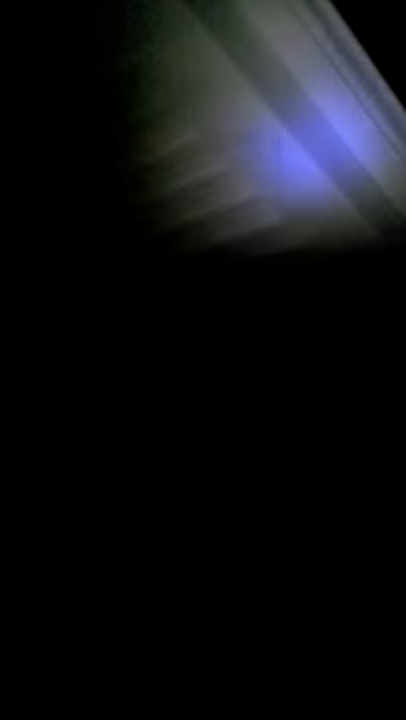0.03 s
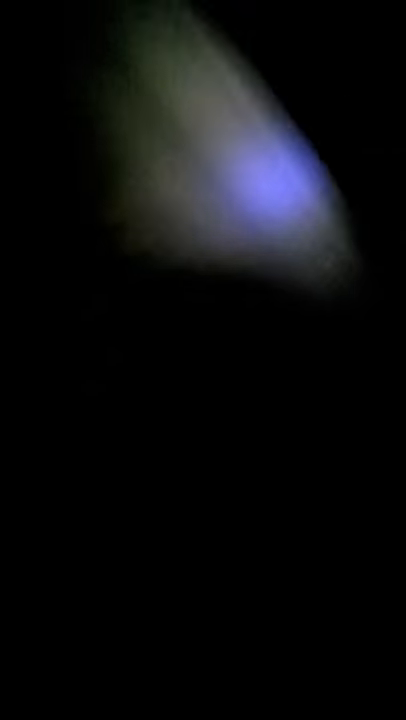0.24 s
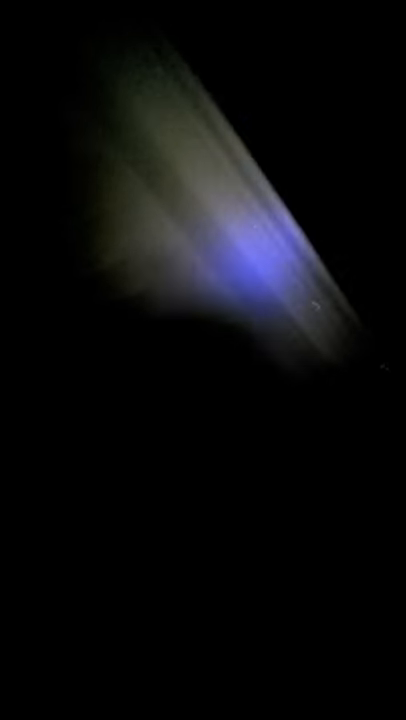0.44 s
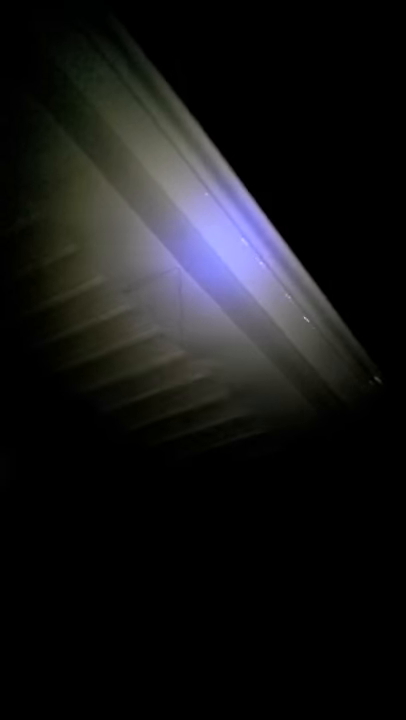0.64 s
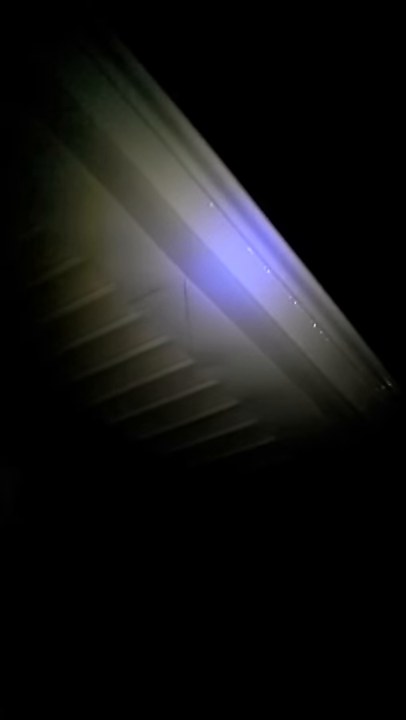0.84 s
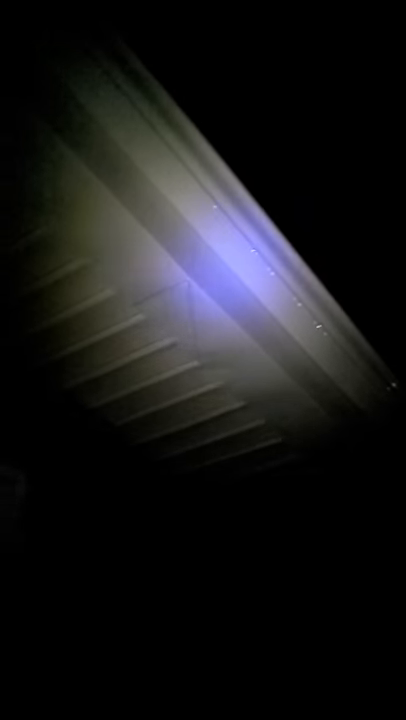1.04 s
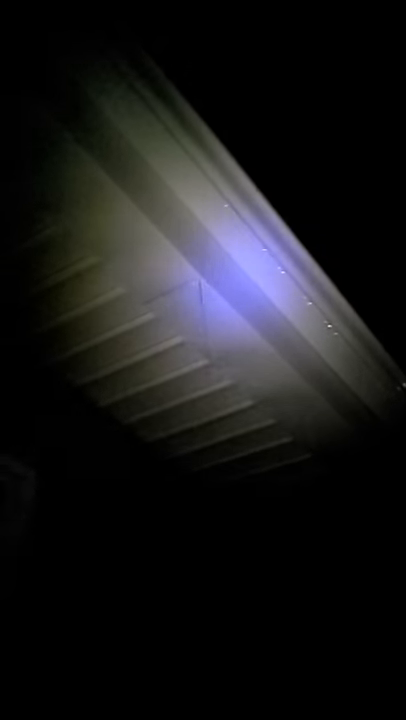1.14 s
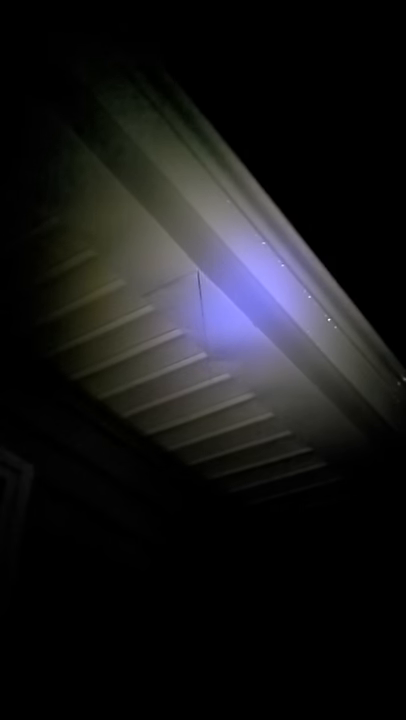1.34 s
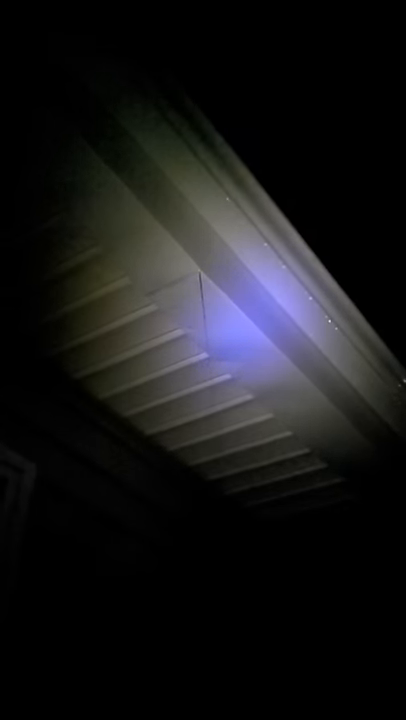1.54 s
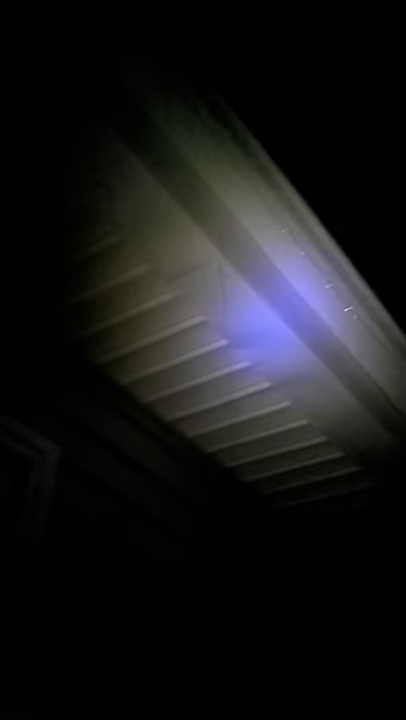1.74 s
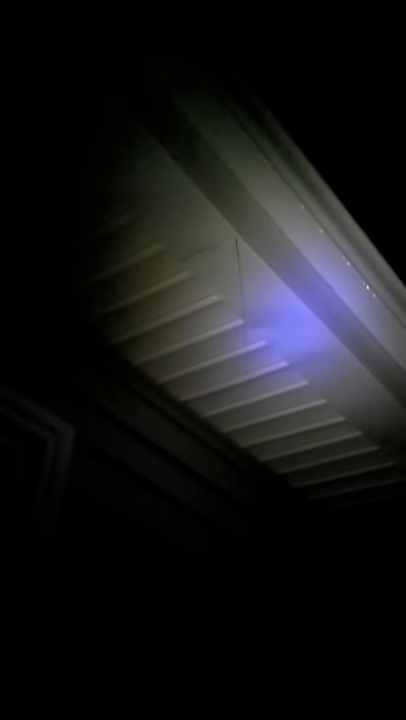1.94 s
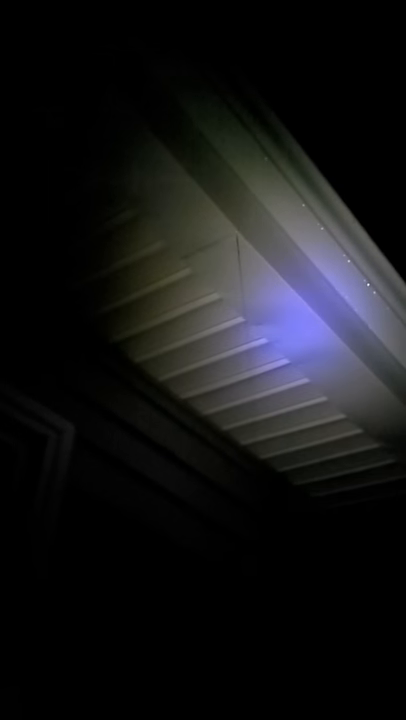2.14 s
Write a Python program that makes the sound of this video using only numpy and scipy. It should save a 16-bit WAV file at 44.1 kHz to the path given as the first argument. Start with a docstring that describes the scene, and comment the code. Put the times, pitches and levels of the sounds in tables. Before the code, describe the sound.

Light ticking drips off a roof edge over faint rain, with brief microphone bumps.

```python
"""Night: a soft low rumble and a thin wash of distant rain fade in, and water drips from a house eave.
Each impact excites a brief bright tick, mostly in the left microphone. From 0.1 s a camera shifts in
the hand: friction makes its case rustle, knocks and a thump excite its damped modes, and a fingertip
scuffs it once. After the first second the dripping goes on, with two duller splats on wet ground."""
import sys
import numpy as np
from scipy import signal
from scipy.io import wavfile
from scipy.ndimage import uniform_filter1d

SR = 44100
rng = np.random.default_rng(int(sys.argv[2]) if len(sys.argv) > 2 else 0)


def transcribe(signal):
    """Save signal, clipped to [-1, 1], as a 16-bit WAV file at the path in sys.argv[1]."""
    frames = np.atleast_2d(signal).T
    limited = np.clip(frames, -1, 1)
    pcm = np.round(limited * 32767).astype(np.int16)
    wavfile.write(sys.argv[1], SR, pcm)


N = 97020
BAND_LIMIT_HZ = 14700


def amp(db):
    """Amplitude ratio of a level in decibels."""
    return 10 ** (np.asarray(db) / 20)


def unit(x):
    """Normalisation to rms 1."""
    return x / np.sqrt(np.mean(x ** 2) + 1e-20)


def add(mix, start, sound):
    """Superposition: a sound joins the mix at start/s."""
    part = mix[max(round(start * SR), 0):][:len(sound)]
    part += sound[:len(part)]


def colour(x, spectrum, size=4096):
    """Minimum-phase filtering by a spectral envelope (f/Hz, level/dB)."""
    hz, db = np.transpose(spectrum)
    bin_hz = abs(np.fft.fftfreq(size, 1 / SR)) + 1
    log_gain = np.log(amp(np.interp(np.log(bin_hz), np.log(hz), db)))
    response = np.exp(np.conj(signal.hilbert(log_gain)))
    taps = np.fft.ifft(response).real[:size // 2]
    return signal.fftconvolve(x, taps)[:len(x)]


def noise(spectrum, modulation=1):
    """Source and filter: white noise, modulated, coloured and brought to rms 1."""
    return unit(colour(modulation * rng.standard_normal(N), spectrum))


def background():
    """Stationary noise: outdoor rumble is coherent at the two microphones, distant rain incoherent."""
    # spectral envelopes (f/Hz, relative level/dB)
    rumble_spectrum = [(36, -26), (68, -1.5), (125, 1.5), (240, -7), (320, -4.5), (430, -12.5),
                       (800, -13.5), (1500, -32), (5000, -49)]
    rain_left = [(100, -6.5), (1600, 3.5), (2800, -1), (4700, -6), (6500, 2), (8200, -7.5), (15000, -10)]
    rain_right = [(100, 4), (800, 0), (1500, -7.5), (3000, -7.5), (6800, -12), (9300, -6.5), (15000, -14.5)]
    rumble = np.outer(amp([-53, -54.5]), noise(rumble_spectrum))
    return rumble + [amp(-56.5) * noise(rain_left), amp(-57) * noise(rain_right)]


def drop(band, spectrum, size=4096):
    """Impact response: an impulse and exponentially decaying noise, filtered at a slightly random pitch."""
    t = np.arange(size) / SR
    # band 0: bright ring, 1: lower ring, 2: spray
    splash = amp([-17, -19.5, -2.5][band]) * np.exp(-t / 0.0007)
    fallback = amp([-27, -30, -3.5][band]) * np.exp(-t / 0.0092)  # droplets and near echoes
    wall_echo = amp(-34.5) * np.exp(-t / 0.014)
    detuned = np.array(spectrum) * [1 + 0.04 * rng.uniform(-0.96, 1), 1]
    excitation = (t == 0) + (splash + fallback + wall_echo) * rng.standard_normal(size)
    tick = colour(excitation, detuned, size=1024)
    power = uniform_filter1d(tick ** 2, size=88, mode="constant")
    return tick / np.sqrt(2 * power.max())  # the envelope peaks at 1


def drips(fine_per_s=170, spread_db=2.5, variants=8):
    """Superposed impacts: large drops land one by one over the shot noise of fine ones."""
    # large drops (t/s, bright ring level/dB, lower ring level/dB, spray level/dB)
    landings = [(0.0825, -35.5, -37.5, -67), (0.1116, -29, -36, -50), (0.1945, -34, -46, -62),
                (0.2291, -27, -44, -52), (0.2355, -29, -32, -44), (0.2617, -32, -55, -52),
                (0.282, -34.5, -37, -39), (0.3237, -35, -57, -49), (0.3358, -31, -58, -45),
                (0.3519, -25.5, -38, -44), (0.3893, -29, -60, -43), (0.4414, -27.5, -49.5, -42),
                (0.447, -28.5, -32.5, -48.5), (0.4863, -28.5, -33, -47), (0.5642, -26, -46, -45),
                (0.573, -34.5, -35, -45), (0.655, -44, -58, -54), (0.7217, -34, -40.5, -58),
                (0.7487, -34, -37.5, -53), (0.7678, -22.5, -34.5, -47), (0.8197, -36.5, -35, -64),
                (0.9142, -35, -39.5, -47), (0.9345, -36, -37.5, -43), (0.985, -36.5, -56, -40),
                (1.0111, -37, -55, -42.5), (1.1628, -30.5, -43, -45.5), (1.2174, -34, -41, -62),
                (1.2705, -34, -30.5, -63), (1.35, -36.5, -38.5, -52), (1.3629, -34, -36.5, -55),
                (1.4111, -35, -39, -60.5), (1.4686, -30.5, -55, -46), (1.4824, -41, -40.5, -51),
                (1.5027, -35, -39, -43), (1.5148, -31.5, -47, -49), (1.5324, -38, -49, -49),
                (1.5712, -29, -33, -50), (1.6257, -34.5, -52, -50), (1.652, -30.5, -37.5, -45.5),
                (1.6639, -44, -40, -50), (1.6805, -34, -39, -51), (1.7166, -34, -40, -50.5),
                (1.7316, -29, -48, -35.5), (1.757, -35, -35, -45), (1.841, -35, -38.5, -63),
                (1.8575, -27.5, -31.5, -67), (1.9239, -36.5, -36, -66), (1.9853, -35.5, -42, -51),
                (2.087, -36, -36.5, -68), (2.1047, -30.5, -35, -54), (2.1438, -30.5, -43.5, -48),
                (2.1916, -36.5, -41.5, -63)]
    # spectral envelopes of a drop's three bands (f/Hz, relative level/dB)
    bright_ring = [(3000, -34.5), (5200, -16), (6000, -4), (6550, 0), (7100, -7), (7900, -21.5),
                   (12000, -55)]
    lower_ring = [(1800, -22), (3200, -27), (4050, -10), (4650, 0), (5350, -3), (6500, -20), (12000, -42)]
    spray = [(2500, -20), (6000, 0.5), (8500, -1), (12000, -2.5), (15000, -10)]
    # muffled right microphone relative to the left (level/dB for each band)
    right_db = [-38, -45, -15]
    fine_db = [-51, -55.5, -63.5]
    out = np.zeros((2, N))
    arrivals = rng.random((variants, N)) < fine_per_s / variants / SR
    trains = arrivals * amp(spread_db * np.minimum(rng.exponential(1, (variants, N)), 3))
    for band, spectrum in enumerate([bright_ring, lower_ring, spray]):
        patter = sum(signal.oaconvolve(train, drop(band, spectrum))[:N] for train in trains)
        ticks = amp(fine_db[band]) * unit(patter)
        for start, *levels in landings:
            add(ticks, start, amp(levels[band]) * drop(band, spectrum))
        out += np.outer([1, amp(right_db[band])], ticks)
    return out


def stroke(start, attack, hold, release):
    """Trapezoidal envelope of one hand movement; times in seconds."""
    return np.interp(np.arange(N) / SR, start + np.cumsum([0, attack, hold, release]), [0, 1, 1, 0])


def friction(spectrum, grain_db=2):
    """Sliding friction: rapid random amplitude modulation makes noise grainy."""
    roughness = unit(uniform_filter1d(rng.standard_normal(N), size=60))
    return noise(spectrum, amp(grain_db * roughness))


def rubbing():
    """Friction noise of the hand on the case follows the pressure of each stroke."""
    # strokes (t/s, attack/s, hold/s, release/s, left level/dB, right level/dB)
    rubs = [(0.104, 0.051, 0.037, 0.027, -57, -46.5), (0.218, 0.0016, 0.018, 0.056, -39, -38.5),
            (0.303, 0.028, 0.071, 0.032, -51.5, -46.5), (0.437, 0.0041, 0.0081, 0.046, -49, -45.5)]
    # spectral envelope of the rustle (f/Hz, relative level/dB)
    spectrum = [(80, -4), (230, 14), (1200, 0.5), (6000, -1.5), (9500, -5.5), (14500, -31)]
    pressure = sum(np.outer(amp([left, right]), stroke(*timing)) for *timing, left, right in rubs)
    return pressure * [friction(spectrum), friction(spectrum)]


def knocks(size=2048):
    """Impulses excite damped modes of the case; a softer touch has a lower treble cutoff."""
    # modes (t/s, peak level/dB, f/Hz, bandwidth/Hz, bass cutoff/Hz, treble cutoff/Hz, 0 left or 1 right)
    modes = [ (0.1393, -33.5, 597, 110, 300, 925, 1), (0.2232, -4.5, 1360, 4940, 316, 6400, 0),
             (0.2231, -8, 626, 154, 256, 1270, 1), (.22381, -13.5, 1360, 467, 815, 2440, 1),
             (.2400, -21, 585, 130, 250, 1050, 1), (0.2945, -1.5, 82, 194, 104, 11700, 0),
             (0.3563, -7, 6200, 16000, 890, 13900, 0), (0.5782, -29, 510, 690, 100, 1800, 1),
             (0.9006, -7, 373, 660, 36, 1295, 1), (0.9113, -29.5, 520, 300, 100, 1310, 1),
             (0.9131, -26.5, 500, 400, 100, 1300, 1)]
    out = np.zeros((2, N))
    for start, db, hz, width_hz, bass_hz, treble_hz, side in modes:
        radius = np.exp(-np.pi * width_hz / SR)
        feedback = [1, -(1 + radius ** 2) * np.cos(2 * np.pi * hz / SR), radius ** 2]
        ring = signal.lfilter([1, -1], feedback, signal.unit_impulse(size))
        ring = signal.lfilter(*signal.butter(2, bass_hz, "high", fs=SR), ring)
        ring = signal.lfilter(*signal.butter(3, treble_hz, fs=SR), ring)
        add(out[int(side)], start, amp(db) * ring / abs(ring).max())
    return out


def scuff():
    """A fingertip slides over the right microphone: a short burst of bright friction noise."""
    # spectral envelope (f/Hz, relative level/dB)
    spectrum = [(1500, -12.5), (2500, -10), (3700, -12), (6000, -2), (8700, 0.5), (14500, -15.5)]
    pressure = stroke(start=0.536, attack=0.0025, hold=0.014, release=0.016)
    return np.outer([0, amp(-28.5)], pressure * friction(spectrum))


def splats():
    """Impacts on wet ground to the left sound duller: their energy lies at lower frequencies."""
    # drops (t/s, level/dB)
    landings = [(1.6803, -42), (2.0758, -42.5)]
    # spectral envelope (f/Hz, relative level/dB)
    spectrum = [(500, -21), (1900, -1.5), (3000, -2), (9000, -23)]
    out = np.zeros((2, N))
    for start, db in landings:
        add(out[0], start, amp(db) * drop(1, spectrum))
    return out


def scene():
    """Linear superposition of background, water and handling at the two microphones."""
    return background() + drips() + rubbing() + knocks() + scuff() + splats()


def record(dry):
    """A rising gain fades the sound in; a linear-phase low-pass filter limits its band."""
    # gain curve (t/s, level/dB)
    fade_in = [(0, -37.5), (0.018, -9), (.07, -4), (.12, 0)]
    faded = dry * amp(np.interp(np.arange(N) / SR, *np.transpose(fade_in)))
    low_pass = signal.firwin(255, BAND_LIMIT_HZ, window=("kaiser", 8), fs=SR)
    return signal.oaconvolve(faded, low_pass[None], "same")


dry = scene()
out = record(dry)
transcribe(out)
```